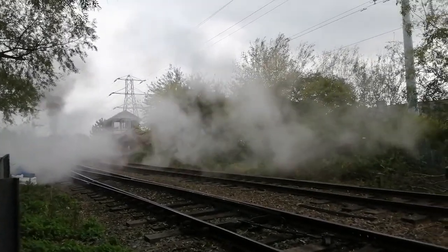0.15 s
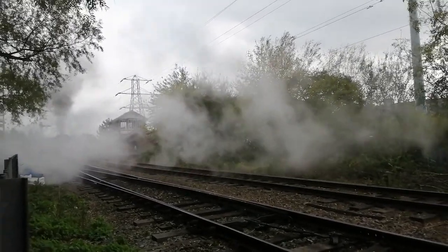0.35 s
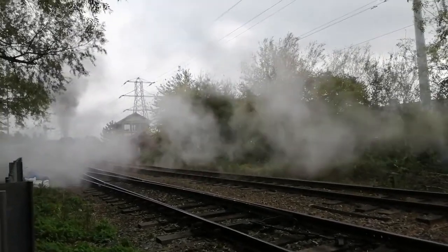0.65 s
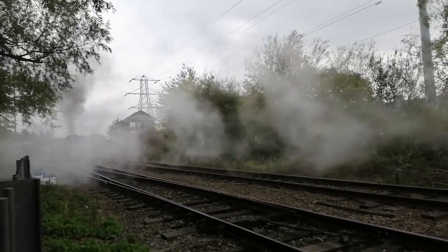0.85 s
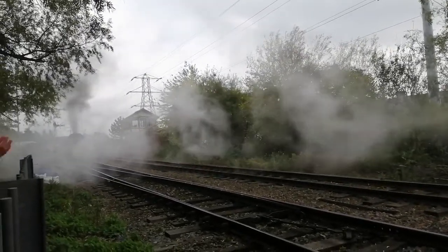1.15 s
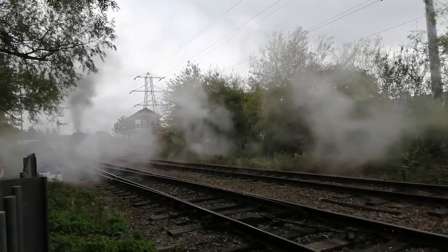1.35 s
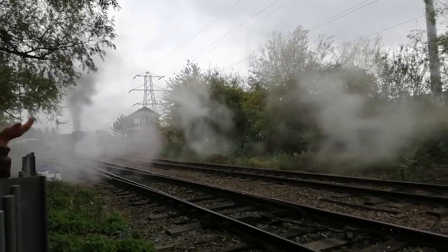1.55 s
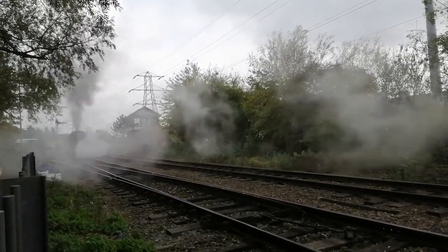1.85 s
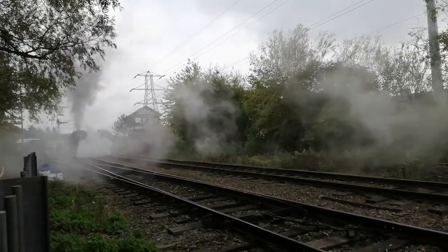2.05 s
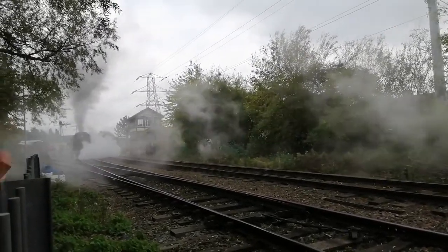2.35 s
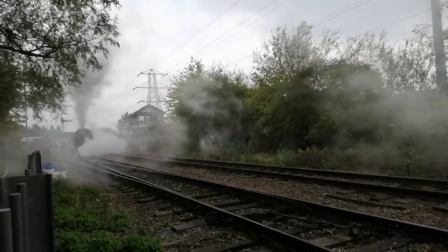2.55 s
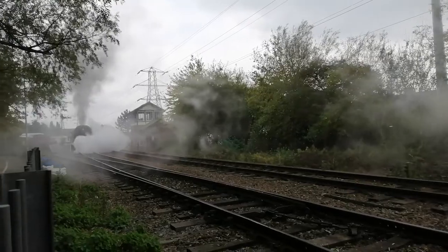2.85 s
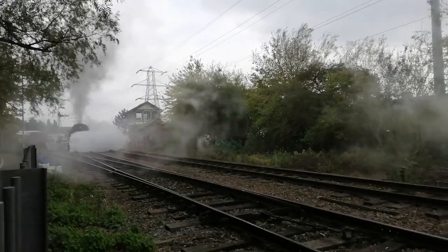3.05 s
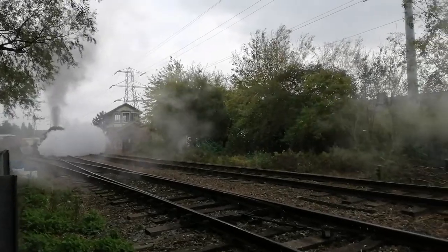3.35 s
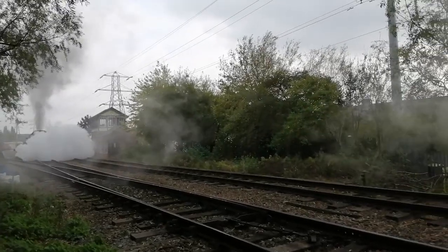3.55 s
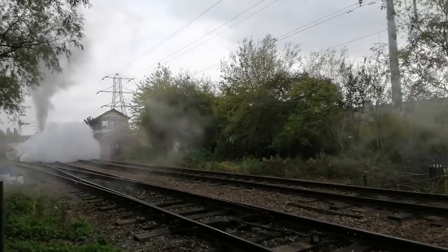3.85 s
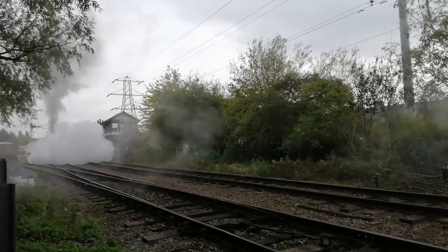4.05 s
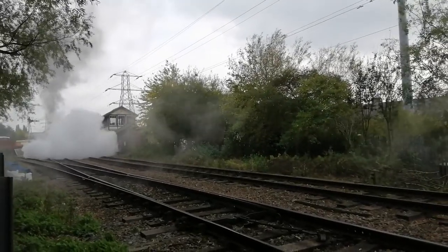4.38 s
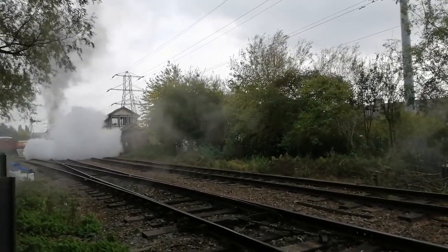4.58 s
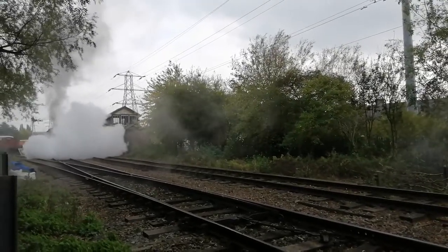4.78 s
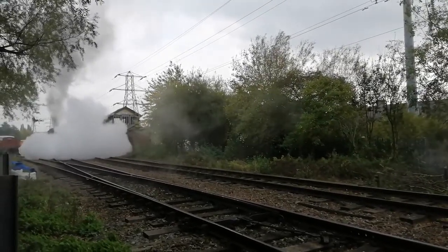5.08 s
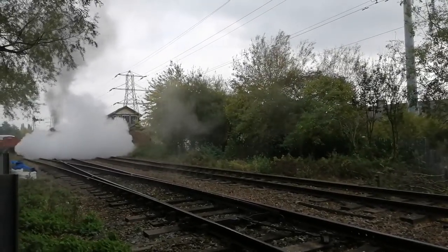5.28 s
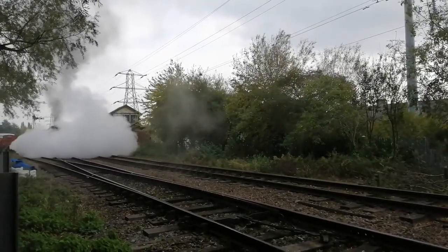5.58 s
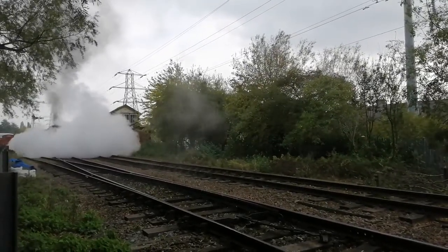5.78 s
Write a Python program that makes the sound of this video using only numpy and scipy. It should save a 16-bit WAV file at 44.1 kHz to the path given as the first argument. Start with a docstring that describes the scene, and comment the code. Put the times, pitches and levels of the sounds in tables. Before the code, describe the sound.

From 0 to 1.25 seconds, a distant steam engine simmers with a soft, thin hiss, over gusty low rumble, a muffled far roar and a wavering deep hum near 65 hertz. Wind bumps the microphone around 0.2, 0.6 and 1.1 seconds. At about 1.27 a vent opens: within a tenth of a second a strong steam jet bursts out, with extra body at 1.37, then a dense bright hiss concentrated around 3 to 8 kilohertz, burying the simmer. It stays strongest until about 2.8, fluttering irregularly. Around 2.3 the sound shifts from the right toward the left and becomes more diffuse, as though through cloud. From 3 seconds it eases by several decibels, with quick small surges near 3.4, 3.65, 4.5 and 5.86. Wind thumps return near 3.1, 3.9, 4.3 and 5.3. The hiss continues to the end, about 6 seconds. Open outdoor space, small stereo camera, dull extreme top.

```python
"""First a soft simmer far down the track, over low rumble, a wavering hum, a far roar and puffs of wind.
Then the steam engine opens a vent: the jet bursts out, direct at first, then more and more through its cloud.
The place is heard by a small camera with two unlike microphone ports; each source is noise coloured in
frequency and moved by slow level curves, except the hum, a wavering sine, and the puffs, short pulses."""
import sys
import numpy as np
from scipy import signal
from scipy.fft import rfft, irfft, next_fast_len
from scipy.io import wavfile
from scipy.ndimage import uniform_filter1d

SR = 44100
rng = np.random.default_rng(int(sys.argv[2]) if len(sys.argv) > 2 else 0)


def put_to_file(sound):
    """Save the sound as 16-bit audio at rate SR, in the file named by the first command-line argument."""
    columns = np.atleast_2d(sound).T  # one column per channel
    safe = np.clip(columns, -1, 1)
    whole_steps = np.round(safe * 32767)
    wavfile.write(sys.argv[1], SR, whole_steps.astype(np.int16))


N = 261072
TIME = np.arange(N) / SR  # s
SLOW = TIME[::64]  # coarse time grid for level curves, s
SIZE = next_fast_len(N)
HZ = np.maximum(np.arange(SIZE // 2 + 1) * SR / SIZE, 1)

# Low rumble around the place. Each row: frequency in Hz, spectrum level in dB.
RUMBLE_COLOUR = [(20, -0.5), (45, -2.5), (135, 4), (170, -1.5), (230, -17)]
# Roar from far off. Each row: frequency in Hz, spectrum level in dB.
ROAR_COLOUR = [(140, -22), (200, 1), (280, 1.5), (350, -1), (500, 1), (600, -3.5), (750, -21)]
# Slow course of the low sounds. Each row: time in seconds, rumble curve in dB, far roar curve in dB.
LOW_COURSE = [(0, -65, -65), (.22, -51.5, -62), (.45, -58.5, -63.5), (1.15, -61.5, -61.5),
              (1.45, -64.5, -66), (1.75, -71, -66.5), (2.08, -60, -59), (2.26, -69, -62),
              (2.82, -60.5, -59), (3.2, -63.5, -61.5), (3.87, -69, -63.5), (4.3, -62, -63),
              (5.0, -65, -67.5), (5.38, -62.5, -61.5), (5.7, -63, -67.5), (5.92, -71, -68)]
# Low sounds between the ports. One row: left minus right before the shift in dB, after it in dB.
LOW_SIDES = (-1, 7)
# Swells of the hum. Each row: centre in seconds, height in dB, half length in seconds.
HUM_SWELL_ROWS = [(.12, -45.5, .15), (.3, -49, .08), (.62, -48, .12), (1.1, -52, 0.2), (1.5, -66, .1),
                  (3.06, -59, .1), (3.7, -63.5, 0.15), (4.2, -62, 0.17), (4.63, -57, 0.08),
                  (5.12, -56.5, 0.21), (5.7, -57.5, 0.27)]
# Wind on the ports. Each row: centre in seconds, peak in dB, pitch in Hz, left minus right in dB,
# length in cycles.
WIND_PUFFS = [(.168, -41, 80, -8, .6), (0.209, -38, 105, -21, 0.37), (.603, -46, 70, 8, 0.58),
              (1.13, -44, 89.2, -16, 0.46), (2.985, -55, 70, -8, .6), (3.081, -47, 80, 14, .6),
              (3.906, -48.5, 188, 19, 0.56), (4.165, -48, 80, 9, .6), (4.279, -35.5, 96, 8, 0.47),
              (4.35, -48, 70, 6, .6), (5.33, -47, 60, 8, 0.53)]
# The simmering engine, which sinks away under the jet. Each row: time in seconds, level in dB.
SIMMER_COURSE = [(0, -44), (.3, -43), (.59, -44.5), (.74, -40), (.97, -44.5), (1.3, -43.5), (1.5, -55)]
# Simmer as the left port colours it. Each row: frequency in Hz, spectrum level in dB.
SIMMER_AT_LEFT = [(340, -9.5), (560, -11), (720, 0), (950, -7), (1380, -13.5), (2580, 1), (3960, -9.5),
                  (5000, -4), (6200, -9), (7060, 0), (7750, -10.5), (8100, -10), (9650, -21.5),
                  (14810, -29)]
# Simmer as the right port colours it. Each row: frequency in Hz, spectrum level in dB.
SIMMER_AT_RIGHT = [(340, -13), (560, -15), (720, -3), (950, -4.5), (1380, -7.5), (3270, -3.5), (3960, -8.5),
                   (4650, 4.5), (5170, 8), (6370, -2.5), (7060, -9), (7920, -17.5), (14810, -22.5)]
# Direct sound at the right port against the left. Each row: frequency in Hz, phase in radians,
# likeness from 0 to 1.
PORT_RELATION = [(300, 0, 1), (660, 0, 0.71), (1690, -3, 0.62), (2220, -1.5, 0.34), (2580, -2, 0),
                 (3490, -1.5, 1), (4030, -3, 1), (5230, -3.5, 0.6), (6180, -5, 0), (8350, -29.5, 0.3),
                 (9100, -2, 0.8), (8600, -19.5, 1), (10350, 4, 0), (12200, -26, 1), (14400, -15, 1)]
# Jet as the left port colours it. Each row: frequency in Hz, spectrum level in dB.
JET_AT_LEFT = [(500, -17), (900, -13.5), (1950, -5.5), (2350, -1), (3350, -1.5), (3790, -8), (5170, -0.6),
               (5680, -2), (6890, 1.5), (7410, -1), (7750, -7.5), (8440, -8.5), (9300, -18), (14810, -37.5)]
# Jet as the right port colours it. Each row: frequency in Hz, spectrum level in dB.
JET_AT_RIGHT = [(340, -29), (520, -29), (860, -14), (1550, -8.5), (2070, -8), (3270, -6.5), (3790, -9.5),
                (4130, -4.5), (5170, 8.5), (5510, 6), (6370, -7.5), (7060, -10.5), (7750, -21),
                (14810, -34.5)]
# Course of the open jet against its settled level. Each row: time in seconds, flow in dB,
# bass curve in dB, treble curve in dB.
JET_COURSE = [(1.3, 9, 4.5, -0.5), (1.62, 5, -0.5, 1), (1.78, 7, -0.5, 5), (1.93, 8.5, 4, 1.5),
              (2.15, 5.5, 3, 0.5), (2.35, 6.5, 6.5, 4.5), (2.68, 3, 4.5, 2), (2.85, 5.5, 5.5, 0),
              (3.0, 1, 5, -0.5), (3.15, 2.5, 6, 0.5), (3.75, -1, 1.5, -0.5), (3.95, 1.5, 1.5, -2),
              (4.45, -2.5, 0.5, -2.5), (4.65, -1, 0, 1), (5.4, -1.5, -1.5, 0.5), (5.78, -.5, 1, 1),
              (5.92, -4, -1, -2)]
# Level regions of the jet. One row: centres in Hz, low to high.
REGION_CENTRES = (750, 1500, 2800, 5000, 7200, 11000)
# Behaviour of the regions, low to high. Each row: settled level in dB, dB per dB of its curve,
# change at the opening burst in dB, rise in seconds, dB per dB of surge.
REGION_LEVELS = [(-56.5, 1.34, 8.5, 0.053, 0.36), (-50, 1, 9.5, 0.064, -0.73),
                 (-40.5, 1.14, 5.5, 0.078, 0.01), (-34.5, 0.8465, -3.5, 0.11, 1),
                 (-36, 0.66, -3.5, 0.13, -0.12), (-54.5, 1.16, -9, 0.087, 0.15)]
# Curve that each region follows. One row: 0 flow, 1 bass or 2 treble, regions low to high.
REGION_CURVES = (1, 1, 0, 0, 2, 2)
# Regions between the ports, low to high. Each row: left minus right before the shift in dB,
# after it in dB, extra as the vent opens in dB.
REGION_SIDES = [(-0.5, 7.5, -2), (5.5, 3.5, -11), (12.5, 7.5, -6), (-10, -3.5, -6.5), (6, 8, 7),
                (4, 3.5, -2)]
# Quick surges and lulls of the jet. Each row: centre in seconds, height in dB, half length in seconds.
JET_SURGES = [(1.38, 1.5, 0.018), (1.43, 2, .02), (1.475, -1.5, 0.021), (1.58, 2, 0.05), (2.08, 1.5, .05),
              (2.38, 2, 0.017), (2.57, 1, .04), (2.91, 1, 0.053), (3.03, -0.5, 0.031), (3.18, 3.5, 0.013),
              (3.25, -0.5, 0.033), (3.33, 3.5, 0.059), (3.45, 4, 0.048), (3.65, 5.5, 0.03),
              (3.85, 2.5, 0.026), (4.37, 3, 0.023), (4.49, 5.5, 0.056), (4.58, -2, 0.036), (4.67, 2, 0.026),
              (5.0, 2.5, 0.063), (5.86, 5, 0.053)]

HUM_HZ, HUM_WAVER_HZ, HUM_TURN = 64.7, 2.55, 0.64  # Hz, spread in Hz, radians between the ports
HUM_REST_DB = -76.5  # floor of the hum between its swells
ROAR_BASS_DROP_DB, ROAR_BASS_HZ = -8.5, 310  # the roar loses bass at the shift
SHIFT_S, SHIFT_LENGTH_S = 2.3, 0.18  # most of the sound shifts once between the ports
VENT_OPENS_S = 1.2645
BURST_PEAK_S, BURST_RISE_S, BURST_FALL_S = 1.374, 0.034, .09
OPENING_SWING_S = .25  # decay of the opening's extra side
DIRECT_FIRST, DIRECT_LAST = 0.9, 0.37  # direct share of the jet's power, 0-1
HIDDEN_S, HIDING_S = 2.41, 0.28  # middle and length of the cloud's hiding, s
TOP_HZ = 15150


def undb(db):
    """Decibels to gain."""
    return 10 ** (np.asarray(db) / 20)


def along_time(table):
    """Value columns of a table interpolated on the slow time grid."""
    seconds, *columns = np.transpose(table)
    return [np.interp(SLOW, seconds, column) for column in columns]


def along_hz(table):
    """Value columns of a table interpolated on a log frequency axis."""
    hz, *columns = np.transpose(table)
    return [np.interp(np.log(HZ), np.log(hz), column) for column in columns]


def step(seconds, length):
    """Smooth step from 0 to 1 around a moment."""
    return .5 + .5 * np.tanh(2 * (SLOW - seconds) / length)


def bumps(table, gain=lambda v: v):
    """Sum of bell-shaped bumps on the slow time grid."""
    return sum(gain(height) * np.exp(-((SLOW - centre) / half) ** 2) for centre, height, half in table)


def walk(rate):
    """Random levels held 1 / rate seconds and slewed twice on the slow time grid; spread 1."""
    hold = int(1 / SLOW[1] / rate)
    levels = np.repeat(rng.standard_normal(len(SLOW) // hold + 1), hold)
    slewed = uniform_filter1d(uniform_filter1d(levels, hold), hold)[:len(SLOW)]
    return slewed / slewed.std()


def noise_pair(likeness, phase=0.):
    """Spectra of two noises that are alike by the given share, the second turned in phase."""
    first, other = rfft(rng.standard_normal((2, SIZE)))
    likeness = np.clip(likeness, 0, 1)
    shared = likeness * np.exp(1j * phase) * first
    return np.array([first, shared + np.sqrt(1 - likeness ** 2) * other])


def level(pair, db):
    """Both channels scaled so that their mean has this rms."""
    return pair * undb(db) / np.sqrt(np.mean(pair.mean(0) ** 2))


def played(pair, db, pan_db):
    """Two channels under a slow level curve and a left minus right curve."""
    return pair * [np.interp(TIME, SLOW, undb(db + side * pan_db / 2)) for side in (1, -1)]


def low_sides():
    """Left minus right of the low sounds, which shift once towards the left port."""
    before, after = LOW_SIDES
    return before + (after - before) * step(SHIFT_S, SHIFT_LENGTH_S)


def far_roar():
    """Far roar: noise from 140 to 750 Hz, half alike at the ports, losing bass at the shift."""
    spectra = undb(along_hz(ROAR_COLOUR)[0]) * (HZ > 140) * (HZ < 750) * noise_pair(.5)
    bass = irfft(spectra / (1 + (HZ / ROAR_BASS_HZ) ** 6), SIZE)[:, :N]
    bass_gain = undb(ROAR_BASS_DROP_DB * step(SHIFT_S, SHIFT_LENGTH_S))
    roar = irfft(spectra, SIZE)[:, :N] - bass * (1 - np.interp(TIME, SLOW, bass_gain))
    return played(level(roar, 0), along_time(LOW_COURSE)[1], 1.17 * low_sides())


def rumble(gust_db=1.5, side_db=1.5):
    """Gusty rumble: noise below 230 Hz, mostly unlike at the two ports."""
    spectra = undb(along_hz(RUMBLE_COLOUR)[0]) * (HZ < 230) * noise_pair(.25)
    noise = level(irfft(spectra, SIZE)[:, :N], 2.4)
    gusty_db = along_time(LOW_COURSE)[0] + gust_db * walk(16)
    return played(noise, gusty_db, low_sides() + side_db * walk(15))


def hum():
    """Narrow hum: a sine of wavering pitch that comes and goes, turned in phase between the ports."""
    pitch = np.interp(TIME, SLOW, HUM_HZ + HUM_WAVER_HZ * walk(6))
    phase = 2 * np.pi * np.cumsum(pitch) / SR
    tone = np.sin(phase + np.array([[0], [HUM_TURN]]))
    hum_db = 20 * np.log10(undb(HUM_REST_DB) + bumps(HUM_SWELL_ROWS, undb))
    return played(level(tone, -3), hum_db + 1.5 * walk(9.2), low_sides())


def puffs():
    """Wind at the ports: each puff pushes the membranes in and out about once."""
    out = np.zeros((2, N))
    for seconds, db, hz, pan_db, cycles in WIND_PUFFS:
        turns = (TIME - seconds) * hz
        push = np.cos(2 * np.pi * turns) * np.exp(-(turns / cycles) ** 2)
        out += push * undb(db + np.array([[pan_db], [-pan_db]]) / 2)
    return out


def at_ports(left, right, share, cloud_hz=1900):
    """Hiss at the two ports, a share of its power direct and the rest scattered by the cloud."""
    phase, likeness = along_hz(PORT_RELATION)
    ports = undb([along_hz(left)[0], along_hz(right)[0]]) * np.minimum(HZ / 340, 1) ** 2
    direct = irfft(ports * noise_pair(likeness, phase), SIZE)[:, :N]
    # scattered sound comes from many sides: only waves longer than the port spacing stay alike
    scattered_likeness = likeness / (1 + (HZ / cloud_hz) ** 4)
    cloud = irfft(ports * noise_pair(scattered_likeness, phase), SIZE)[:, :N]
    share = np.clip(share, 0, 1)
    return np.sqrt(share) * direct + np.sqrt(1 - share) * cloud


def simmer(share=0.2, swell_db=.5):
    """Soft steady hiss of leaks and chimney, mostly scattered."""
    hiss = level(at_ports(SIMMER_AT_LEFT, SIMMER_AT_RIGHT, share), 0)
    return played(hiss, along_time(SIMMER_COURSE)[0] + swell_db * walk(6.7), swell_db * walk(3.7))


def jet_levels():
    """Region levels without surges: a rise as the vent opens, one burst that favours the bass, then the curves."""
    curves = along_time(JET_COURSE)
    late = SLOW - BURST_PEAK_S
    attack = np.exp(-(late / BURST_RISE_S) ** 2)
    burst = np.where(late < 0, attack, np.exp(-np.maximum(late, 0) / BURST_FALL_S))
    levels = []
    for curve, (settled_db, per_db, burst_db, rise, _) in zip(REGION_CURVES, REGION_LEVELS):
        opening = np.clip((SLOW - VENT_OPENS_S) / rise, 1e-3, 1) ** 2
        levels.append(settled_db + per_db * curves[curve] + burst_db * burst + 20 * np.log10(opening))
    return np.array(levels)


def jet_sides():
    """Left minus right of each region: most of the jet starts further right, swings in, and shifts later."""
    swing = np.exp(-np.maximum(SLOW - BURST_PEAK_S, 0) / OPENING_SWING_S)
    shift = step(SHIFT_S, SHIFT_LENGTH_S)
    return np.array([before + (after - before) * shift + opening * swing
                     for before, after, opening in REGION_SIDES])


def steam(swell_db=0.54, flicker_db=1.0, side_db=0.3, surge_right=1.0, top_wobble_db=0.54):
    """Jet noise in third-octave bands whose levels swell together and also flicker one by one."""
    share = DIRECT_FIRST + (DIRECT_LAST - DIRECT_FIRST) * step(HIDDEN_S, HIDING_S)
    mix = rfft(at_ports(JET_AT_LEFT, JET_AT_RIGHT, np.interp(TIME, SLOW, share)), SIZE)
    surge_db = bumps(JET_SURGES)
    region_db = jet_levels() + np.array(REGION_LEVELS)[:, -1:] * surge_db
    spans_hz = [(500, 1100), (1100, 2000), (2000, 3800), (4200, 6000), (6000, 9000), (9000, 15000)]
    spans = np.searchsorted(HZ, spans_hz)
    # the ports shape each region within itself; its level and side come from the curves
    centre, (left, right) = np.abs(mix.mean(0)) ** 2, np.abs(mix) ** 2
    region_db -= 10 * np.log10([[2 * centre[a:b].sum() / SIZE / N] for a, b in spans])
    pans_db = jet_sides() - 10 * np.log10([[left[a:b].sum() / right[a:b].sum()] for a, b in spans])
    # quick surges ring mostly in the right port's resonance
    pans_db[3] -= surge_right * surge_db
    out, swell, top_wobble = 0, walk(5.08), walk(14)
    for hz in 660 * 2 ** np.arange(0, 4.7, 1 / 3):
        band = np.cos(np.pi / 2 * np.clip(3 * np.log2(HZ / hz), -1, 1)) ** 2
        # blend the curves of the two regions around this band
        place = np.interp(np.log(hz), np.log(REGION_CENTRES), range(6))
        k = min(int(place), 4)
        blend = place - k
        db = region_db[k] + blend * (region_db[k + 1] - region_db[k])
        db = db + swell_db * swell + flicker_db * walk(18)
        db = db + (hz > 6000) * top_wobble_db * top_wobble  # small shared level wobble above 6 kHz
        pan_db = pans_db[k] + blend * (pans_db[k + 1] - pans_db[k]) + side_db * walk(9.1)
        out = out + played(irfft(band * mix, SIZE)[:, :N], db, pan_db)
    return out


def scene():
    """Simmer and jet over the low sounds and the wind."""
    return far_roar() + rumble() + hum() + puffs() + simmer() + steam()


def record(dry):
    """The camera cuts the top with a steep low-pass."""
    return signal.sosfilt(signal.ellip(10, .2, 80, TOP_HZ, fs=SR, output="sos"), dry)


dry = scene()
out = record(dry)
put_to_file(out)
```